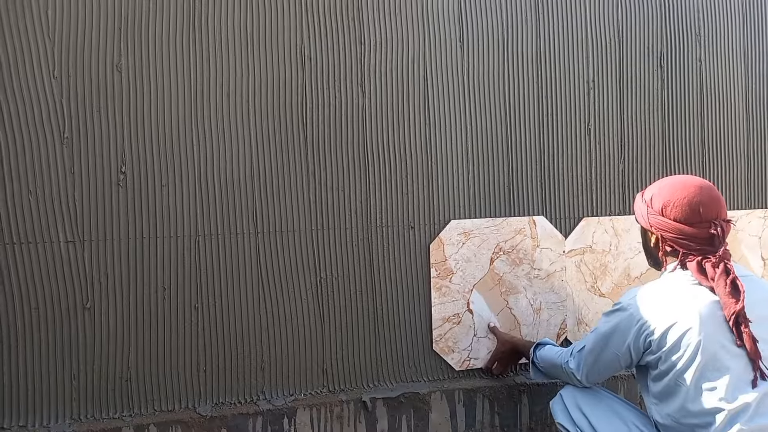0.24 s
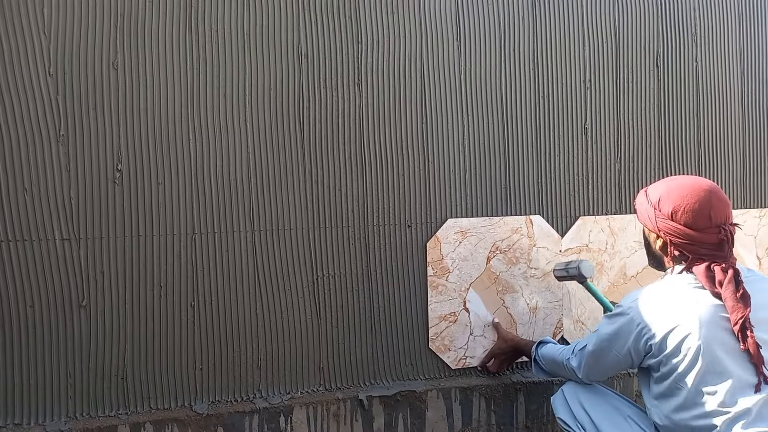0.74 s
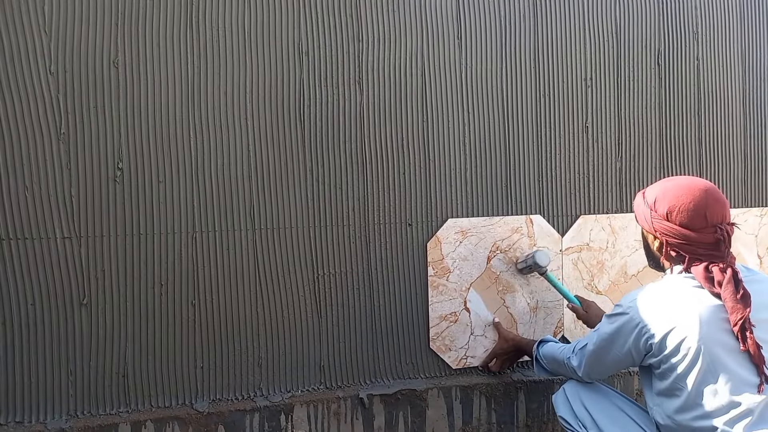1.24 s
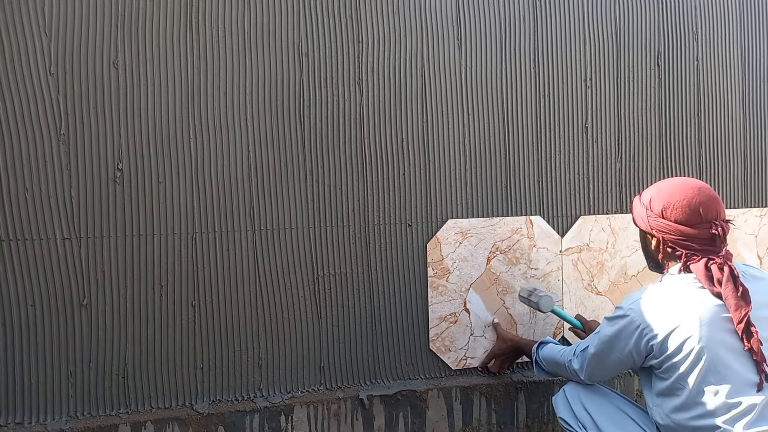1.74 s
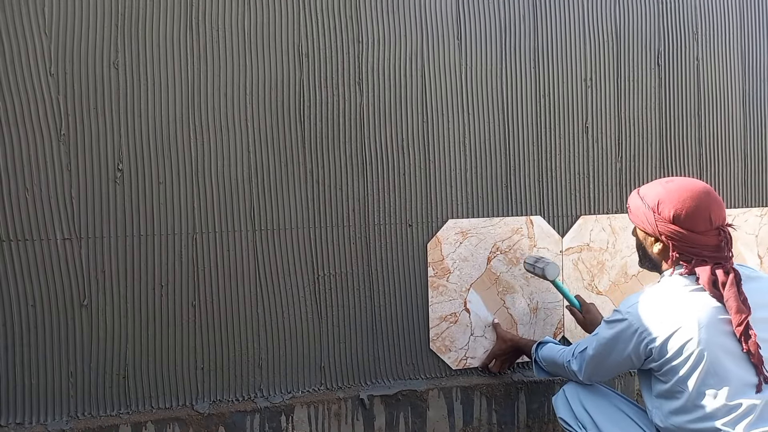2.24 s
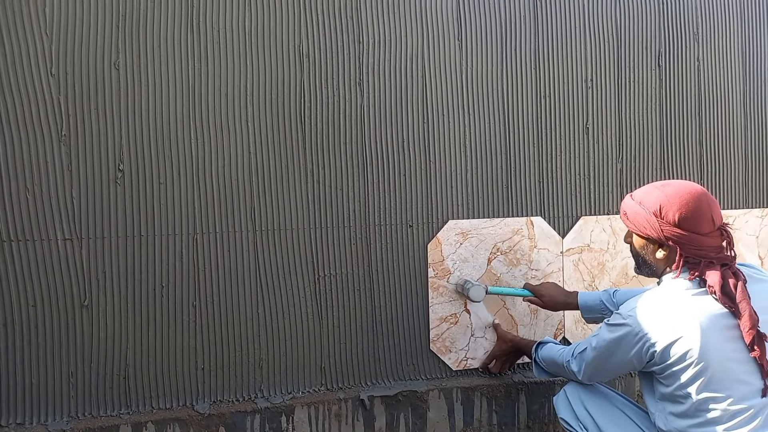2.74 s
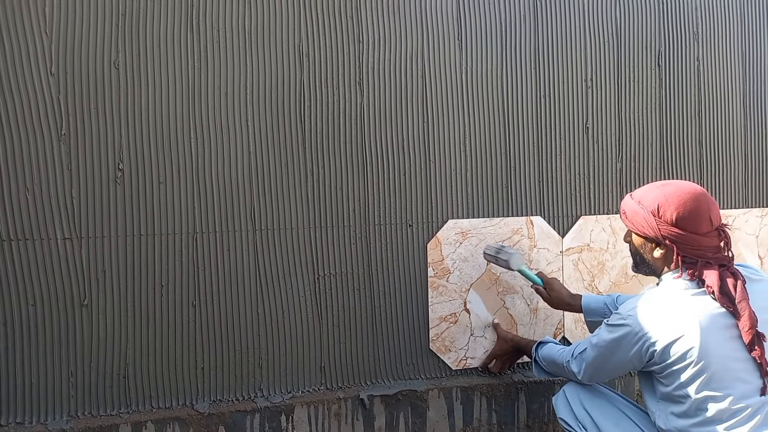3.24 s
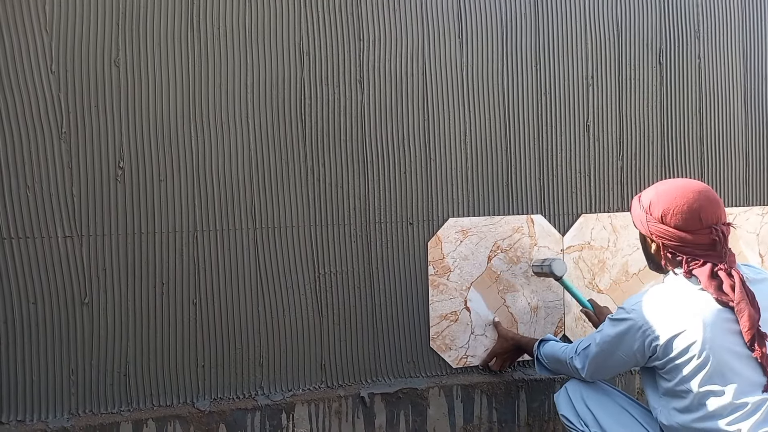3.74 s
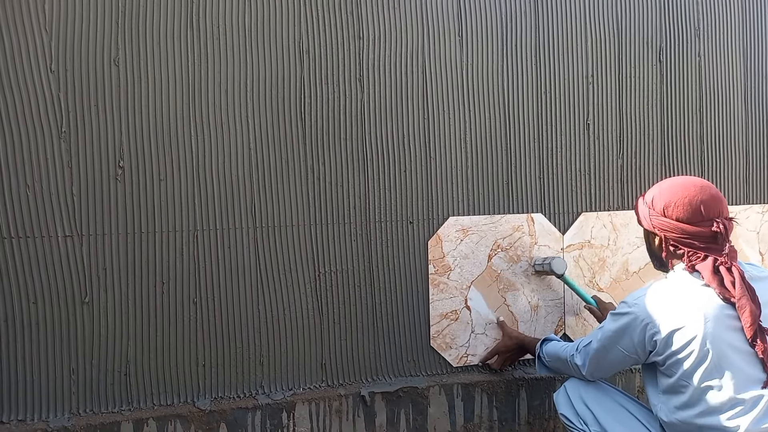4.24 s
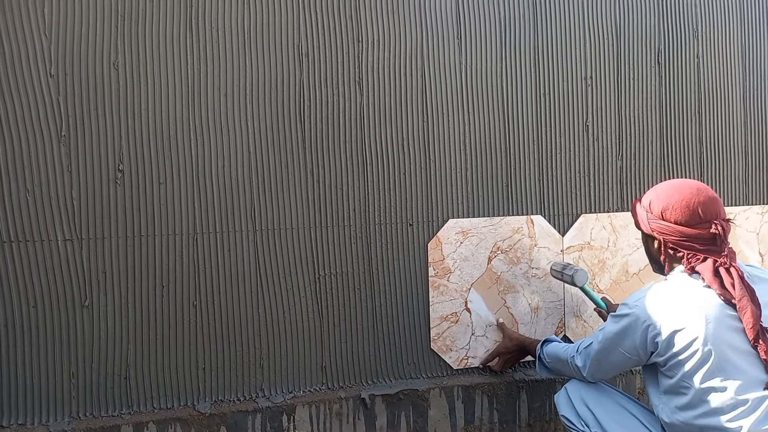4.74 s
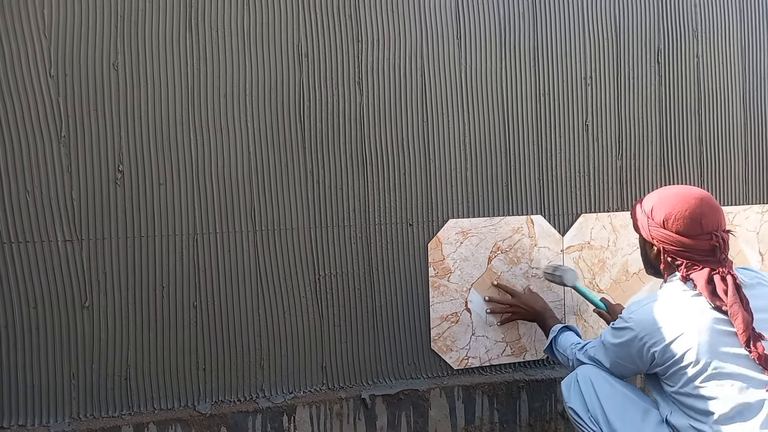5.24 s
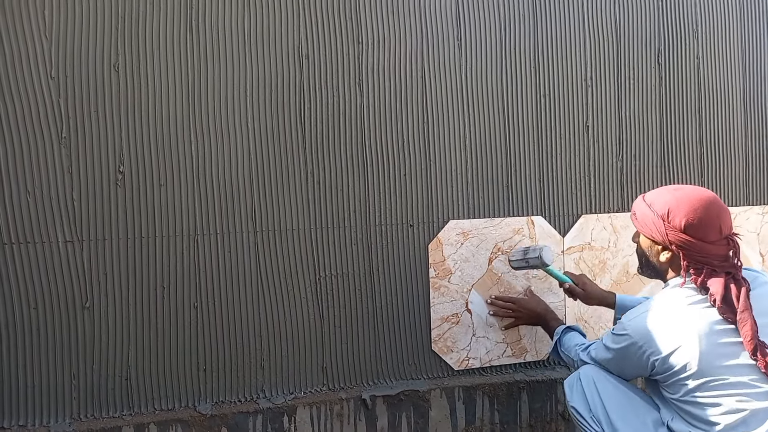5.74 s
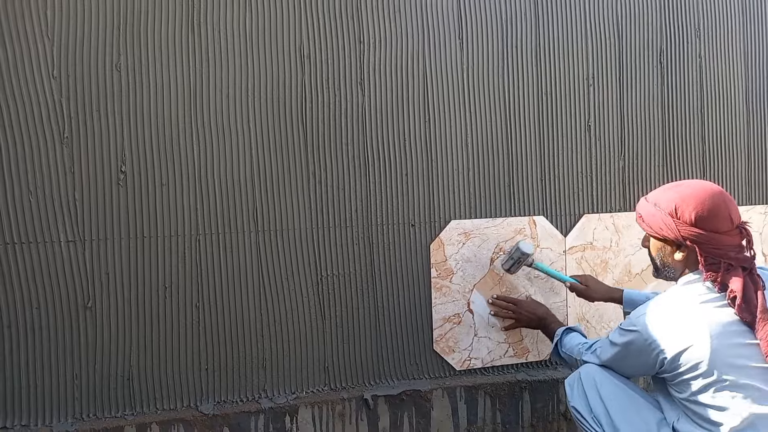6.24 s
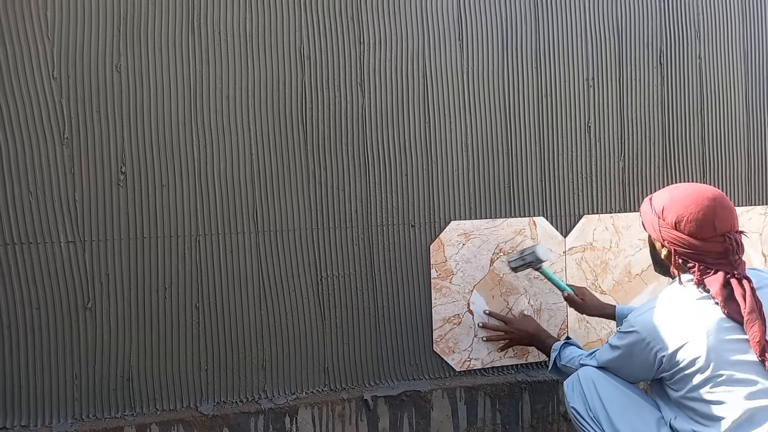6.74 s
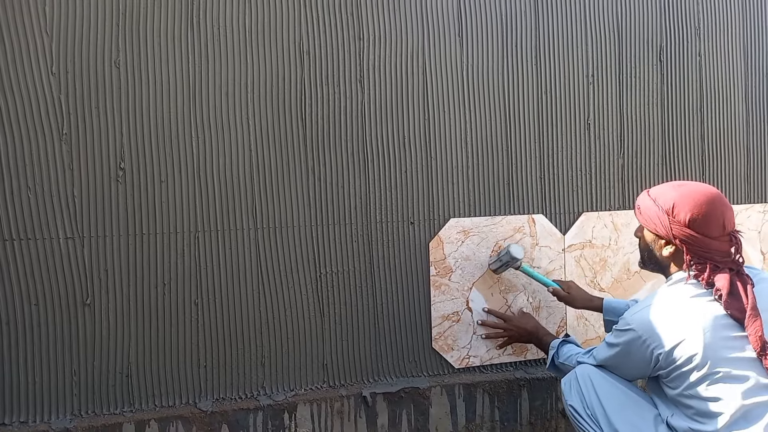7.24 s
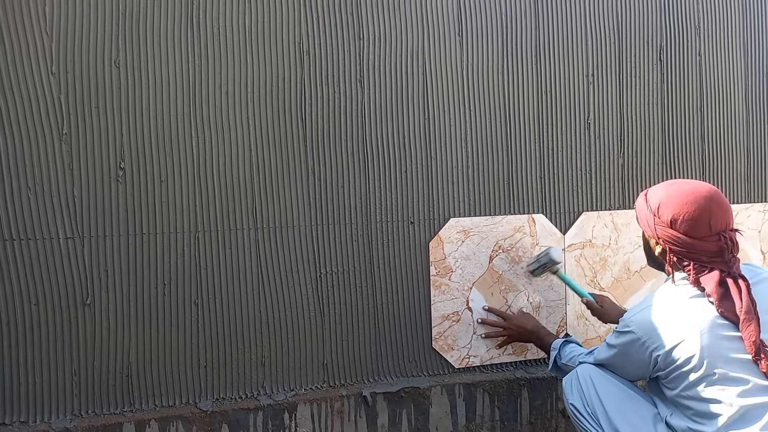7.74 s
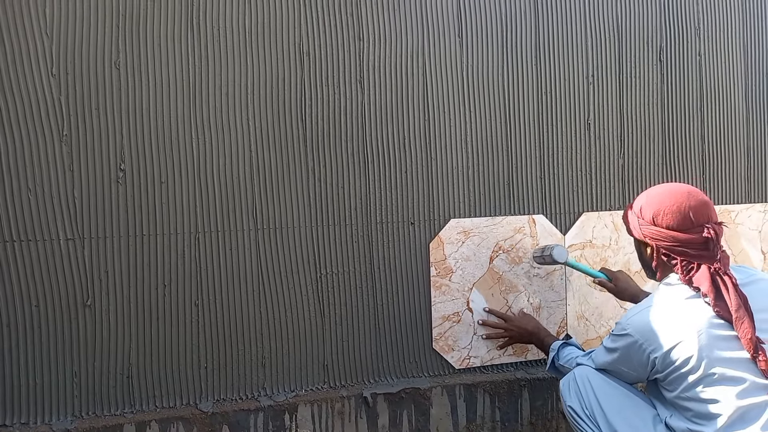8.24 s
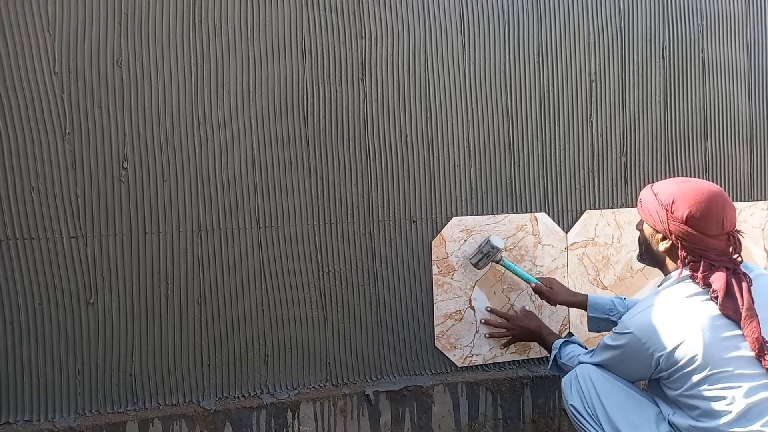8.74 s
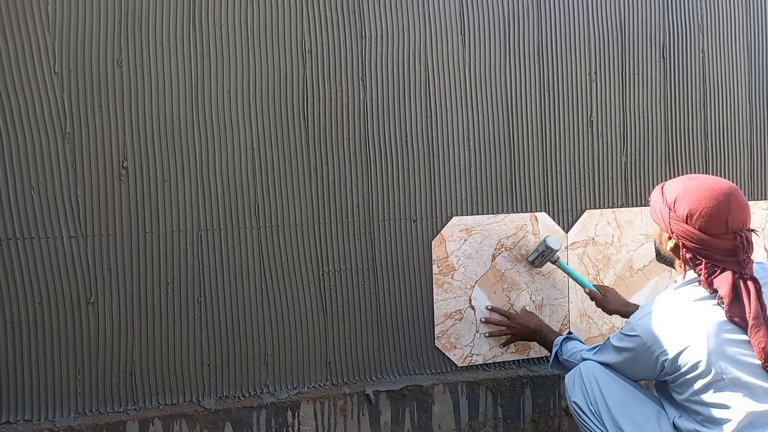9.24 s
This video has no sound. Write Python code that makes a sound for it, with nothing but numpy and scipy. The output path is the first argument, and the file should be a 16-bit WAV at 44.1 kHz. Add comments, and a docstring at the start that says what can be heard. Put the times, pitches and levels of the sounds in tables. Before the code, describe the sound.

A short gritty scrape opens, then a rubber mallet taps a tile on a mortared wall in quick runs of dull, hollow knocks, about seven a second. After about five seconds the taps slow and vary in strength, with more sandy scrapes and stony clicks between. Outdoor building site, quick echo from a facing wall, stereo microphone at moderate distance, hushed pauses.

```python
"""Bedding a tile with a rubber mallet

Quick runs of dull knocks, then slower taps: decaying tile modes plus slap, tick and thud noise, each
after a short swell of noise. A facing wall returns each knock about 36 ms later as a scattered burst.
Gritty strokes, likely a trowel in mortar, reach the right port first: granular noise and a ringing blade.
Bumps, rubs and faint narrow noise bands glide in pitch. Hiss and rumble levels carry the opening
scrape and the knocks' low reverberation."""
import sys
import numpy as np
from scipy import signal
from scipy.fft import rfft, irfft, next_fast_len
from scipy.io import wavfile
from scipy.ndimage import uniform_filter1d

SR = 44100
rng = np.random.default_rng(int(sys.argv[2]) if len(sys.argv) > 2 else 0)


def unload_wav(signal):
    """Save mono or channel-first audio to the path in sys.argv[1] as 16-bit WAV at rate SR, clipped to [-1, 1]."""
    wavfile.write(
        sys.argv[1],
        SR,
        np.round(np.clip(np.atleast_2d(signal).T, -1, 1) * 32767).astype(np.int16),
    )


N = 418068
TIME = np.arange(N) / SR


def undb(db):
    """Decibels to amplitude gain."""
    return 10 ** (np.asarray(db) / 20)


def rms(x):
    """Root mean square, kept above zero."""
    return np.sqrt(np.mean(x ** 2)) + 1e-12


def at(curve, s):
    """Columns of a time curve, interpolated at s."""
    times, *columns = np.transpose(curve)
    return [np.interp(s, times, c) for c in columns]


def colour(x, points):
    """Zero-phase filter through (Hz, dB) points, straight lines over log frequency."""
    hz, db = np.transpose(points)
    size = next_fast_len(x.shape[-1] + 512)
    f_hz = np.maximum(np.arange(size // 2 + 1) * SR / size, 1)
    gain = undb(np.interp(np.log(f_hz), np.log(hz), db))
    return irfft(rfft(x, size) * gain, size)[..., :x.shape[-1]]


def pair(size, likeness):
    """White noise at two microphone ports; likeness is the shared part of its power."""
    shared, *own = rng.standard_normal((3, size))
    likeness = np.clip(likeness, 0, 1)
    return np.sqrt(likeness) * shared + np.sqrt(1 - likeness) * np.array(own)


def shaped(x, points):
    """Coloured sound at rms 1."""
    y = colour(x, points)
    return y / rms(y)


def grains(size, points, likeness, grain_db):
    """Crackle of uneven grains: noise re-scaled at random every 48 samples (1.1 ms), then coloured."""
    level_db = grain_db * np.repeat(rng.standard_normal(size // 48 + 1), 48)[:size]
    return shaped(pair(size, likeness) * undb(level_db), points)


def resonant(size, hz, width_hz):
    """Noise held in one resonance whose centre may glide; rms 1."""
    settle = 4096
    sos = signal.butter(2, min(width_hz / 2, SR / 4), fs=SR, output="sos")
    noise = pair(size + settle, .7) + 1j * pair(size + settle, .7)
    wobble = signal.sosfilt(sos, noise)[:, settle:]
    phase = 2 * np.pi * np.cumsum(hz * np.ones(size)) / SR
    y = np.real(wobble * np.exp(1j * phase))
    return y / rms(y)


def fade(t, t60_s):
    """Exponential decay from time 0, 60 dB per t60."""
    return undb(-60 * np.maximum(t, 0) / t60_s)


def pan(db):
    """Channel gains for a left-minus-right level."""
    return undb(np.array([[db], [-db]]) / 2)


def add(out, s, x):
    """Mix x into out at time s."""
    i = max(int(s * SR), 0)
    out[:, i:i + x.shape[-1]] += x[:, :max(N - i, 0)]


def waver(rate_per_s):
    """Random drift through rate_per_s points a second, spread near 1."""
    return 1.2 * np.interp(TIME * rate_per_s, np.arange(1024), rng.standard_normal(1024))


# hiss and rumble, with the opening scrape and the knocks' low reverberation, relative levels:
# t/s, hiss level/dB, rumble level/dB
HISS_RUMBLE_LEVELS = [(0, -57.5, -52), (.45, -58.5, -53), (.72, -39, -50), (1.1, -54, -43.5),
                      (1.4, -54.5, -45.5), (1.65, -38.5, -31.5), (1.95, -52, -35.5), (3.4, -43.5, -31.5),
                      (4, -52, -38.5), (4.95, -44, -34.5), (5.22, -65, -71.5), (5.5, -50.5, -44),
                      (5.8, -66.5, -60.5), (6.08, -46, -63), (6.35, -62, -73), (7.3, -52, -61),
                      (8.4, -60.5, -59), (9.48, -56, -50)]
# hiss spectrum: f/Hz, level/dB
HISS_SPECTRUM = [(200, -12.5), (900, 0), (1600, 8.5), (2500, 5), (4000, 3.5), (5800, 5.5), (8000, -19),
                 (16000, -8.5)]
# rumble spectrum: f/Hz, level/dB
RUMBLE_SPECTRUM = [(25, -9), (70, 0.5), (135, 9), (190, 1), (320, 9.5), (520, -7), (900, -11.5),
                   (2000, -44)]
HISS_WAVER_DB, HISS_WAVER_PER_S = 2.5, 14
MURMUR_DB, MURMUR_T60_S = -13.5, 0.31  # level relative to blow level + echo curve


def hiss_and_rumble(arrival_s=0.029):
    """Wavering hiss plus rumble; each blow adds decaying low reverberation power to the rumble."""
    hiss_db, rumble_db = at(HISS_RUMBLE_LEVELS, TIME)
    power = undb(rumble_db - 7.0)[None] ** 2
    t = TIME[:SR]
    for s, blow_db, _ in BLOWS:
        echo_db, = at(ECHO_LEVELS, s)
        murmur = undb(blow_db + echo_db + MURMUR_DB) * fade(t, MURMUR_T60_S)
        add(power, s + arrival_s, murmur[None] ** 2)
    hiss_gain = undb(hiss_db + HISS_WAVER_DB * waver(HISS_WAVER_PER_S) - 9)
    hiss = grains(N, HISS_SPECTRUM, 0.1, grain_db=1.5) * hiss_gain
    rumble = shaped(pair(N, 0.2), RUMBLE_SPECTRUM) * np.sqrt(power)
    return (hiss + rumble) * pan(0.92)


# bumps, rubs, and faint narrow noise bands at 2.3-3.3 kHz:
# start t/s, end t/s, first f/Hz, last f/Hz, width/Hz, relative level/dB
GLIDES = [(.103, 0.139, 146, 121, 35, -22), (.083, 0.159, 2430, 2530, 6050, -44),
          (.446, 0.49, 117.6, 97.3, 30, -35.5), (0.514, 0.796, 108.5, 89, 60, -45.5),
          (.79, .835, 1290, 1222, 450, -22.5), (1.48, 1.595, 311, 238.5, 49.7, -20),
          (4.19, 4.473, 1604, 1233, 330, -39.5), (4.634, 4.699, 1308, 1050, 180, -29),
          (4.861, 5.175, 1260, 1135, 176, -49), (5.979, 6.014, 390, 378, 161, -25.5),
          (6.476, 6.539, 416, 416, 60, -23.5), (6.48, 6.521, 694, 693, 100, -21.5),
          (6.525, 6.735, 3050, 3300, 400, -50.5), (7.031, 7.25, 2730, 2440, 350, -55),
          (7.34, 7.489, 2800, 2720, 300, -56), (8.125, 8.207, 2400, 2300, 250, -50),
          (8.668, 8.75, 2630, 2450, 250, -51), (8.282, 8.325, 419, 347, 198, -42.5),
          (8.666, 8.676, 2000, 1920, 900, -19), (9.426, 9.47, 446, 400, 227, -35.5)]


def rubs_and_bands():
    """Noise swells and dies in one resonance per event, gliding in pitch."""
    out, t = np.zeros((2, N)), np.arange(SR // 2) / SR
    for start, end, first_hz, last_hz, width_hz, db in GLIDES:
        progress = np.minimum(t / (end - start), 1)
        hz = first_hz + (last_hz - first_hz) * progress
        sound = resonant(len(t), hz, width_hz) * np.sin(np.pi * progress)
        level = rms(sound[:, progress < 1])
        add(out, start, sound / level * undb(db - 7))
    return out * pan(3.3)


# echo spectrum off the facing wall: f/Hz, level/dB
ECHO_SPECTRUM = [(50, -3), (140, 0.5), (240, 20), (310, 13), (400, 0), (550, 4.5), (900, -8.5),
                 (1400, -3.5), (2200, 4), (6000, 4.5), (16000, -4.5)]


def yard(x, delay_s=0.0355, spread_s=0.0025, early_t60_s=0.12, late_db=-12, late_t60_s=0.25):
    """The facing wall answers in a scattered cluster; a weaker, longer tail wanders round the site."""
    since = np.arange(SR // 2) / SR - delay_s
    onset = np.clip(since / spread_s, 0, 1)
    decay = fade(since, early_t60_s) + undb(late_db) * fade(since, late_t60_s)
    response = colour(pair(len(since), 0.37) * onset * decay, ECHO_SPECTRUM)
    energy_per_port = np.sum(response ** 2) / 2
    return signal.fftconvolve(x, response / np.sqrt(energy_per_port), axes=1)


def blade(x, ripple_db=4.0, count=60):
    """The blade's many modes shift with its angle: each touch gets its own random peaks and dips."""
    hz = np.geomspace(250, 16000, count)
    db = ripple_db * rng.standard_normal(count) - ripple_db ** 2 / 9
    return colour(x, np.c_[hz, db])


def stutter(t, step_s=.007, depth_db=3.0, count=128):
    """The blade catches and slips: a random gain with a new target each step."""
    return undb(depth_db * np.interp(t / step_s, np.arange(count), rng.standard_normal(count)))


def from_right(x, lag_s=.00036):
    """Sound from the right reaches the left port later."""
    return np.array([np.roll(x[0], int(round(lag_s * SR))), x[1]])


# strokes: start t/s, end t/s, relative level/dB, body level re stroke/dB, ring f/Hz
STROKES = [(0.499, 0.89, -48.5, -8.5, 1550), (0.525, 0.549, -33, -0.5, 1913),
           (0.572, 0.586, -37, -3.5, 1910), (.879, 0.914, -48.5, 6, 1330), (1.493, 1.55, -46, 11.5, 1940),
           (1.536, 1.583, -38, 13, 2046), (1.604, 1.636, -47.5, 17, 2290), (2.038, 2.05, -42.5, 5.5, 2170),
           (2.781, 2.802, -43, 17.5, 1570), (2.89, 2.903, -42, 6, 2240), (3.219, 3.288, -29.5, -6.5, 3160),
           (3.504, 3.59, -37.5, -2.5, 1685), (3.564, 3.62, -30, -5.5, 1980),
           (3.894, 3.965, -36.5, 4.5, 1610), (4.192, 4.231, -42.5, 4.5, 1590),
           (4.444, 4.51, -32, -6.5, 2520), (4.814, 4.84, -28.5, 1.5, 1994), (5.109, 5.153, -34, -5, 3266),
           (5.615, 5.671, -28.5, -5, 2557), (5.871, 5.893, -37, -21, 1936), (5.907, 5.994, -29.5, -4, 3100),
           (6.024, 6.059, -29, -14.5, 2265), (6.184, 6.237, -29, -1, 3230), (6.412, 6.437, -51, -24, 1440),
           (6.459, 6.518, -25.5, -15.5, 1560), (6.695, 6.716, -31.5, -24.5, 1460),
           (6.728, 6.816, -25.5, -13, 1327), (6.824, 6.852, -28, 1.5, 3000), (6.862, 6.895, -37, -24, 4180),
           (6.998, 7.033, -27, -29, 3700), (7.248, 7.277, -32, -3, 2120), (7.293, 7.32, -30, -6.5, 5870),
           (7.47, 7.486, -46, 1.5, 6120), (7.515, 7.531, -38, 5.5, 2110), (7.65, 7.682, -36.5, 6, 1260),
           (7.702, 7.733, -23, -26, 4100), (7.96, 7.972, -41.5, -7, 2155), (7.996, 8.001, -43.5, 5.5, 5750),
           (8.051, 8.063, -43.5, -15, 1600), (8.107, 8.119, -40.5, 14, 2120),
           (8.231, 8.25, -29, -22.5, 2085), (8.472, 8.506, -40, -11.5, 1530), (8.575, 8.588, -40, 13, 1960),
           (8.634, 8.674, -40, -5, 1940), (8.747, 8.788, -28.5, -17.5, 2500),
           (8.954, 8.968, -51.5, 9, 1400), (9.029, 9.104, -34, -8, 3190), (9.247, 9.254, -40.5, -13, 1604),
           (9.355, 9.376, -30.5, -5, 3150)]
# stones catching under the blade: t/s, relative level/dB
STONES = [(.545, -13.5), (0.6358, -21), (.836, -17.5), (1.5427, -10), (2.8948, -12.5), (3.5763, -13),
          (3.9297, -7), (4.4848, -2), (5.665, -6.5), (5.906, -4), (5.954, -6), (6.484, -6), (6.7057, -6.5),
          (7.295, -3), (7.4854, -11.5), (7.5266, -6), (7.9707, -12), (8.058, -13), (8.666, -7),
          (8.751, -2.5), (9.2555, -16.5)]
# bright sand spectrum: f/Hz, level/dB
GRIT_SPECTRUM = [(900, -36.5), (2000, 3), (3000, 0), (4500, -3), (6000, -3.5), (16000, -4)]
# rasp spectrum: f/Hz, level/dB
RASP_SPECTRUM = [(300, -27), (750, -1.5), (1100, 2), (1600, 4), (2100, -6), (3200, -25)]
# hollow body spectrum: f/Hz, level/dB
BODY_SPECTRUM = [(30, -29), (100, -5.5), (220, -9), (350, 3), (550, 5), (800, 0), (1500, -31)]
# lighter strokes are duller: more rasp for each dB below a firm one
FIRM_STROKE_DB, RASP_DB, RASP_PER_DB = -30, -2.35, 0.4
# a short touch lets the blade ring, a long drag damps it
RING_DB, RING_STROKE_S, RING_DB_PER_DOUBLING = -3.5, 0.033, 3
STONE_RASP_DB = -6  # re grit part of the click


def trowel(bite_s=0.0048, release_t60_s=0.061, arch_db=3.0):
    """Sand dragged under a blade: grit, rasp, hollow body and one ringing mode; stones click."""
    out, t = np.zeros((2, N)), np.arange(SR * 2 // 3) / SR
    lead_s = .04
    for start, end, db, body_db, ring_hz in STROKES:
        length_s = max(end - start, .003)
        since = t - lead_s
        rasp_db = RASP_DB + RASP_PER_DB * (FIRM_STROKE_DB - db)
        ring_db = RING_DB - RING_DB_PER_DOUBLING * np.log2(length_s / RING_STROKE_S)
        contact = np.exp(np.minimum(since, 0) / bite_s) * fade(since - length_s, release_t60_s)
        # the hand bears down hardest in mid-stroke
        arch = np.sin(np.pi * np.clip(since / length_s, 0, 1)) - 0.59
        pressure = contact * undb(arch_db * arch) * stutter(t)
        grit = grains(len(t), GRIT_SPECTRUM, 0.13, grain_db=2.0) * undb(6.5)
        rasp = grains(len(t), RASP_SPECTRUM, 0.21, grain_db=1.5) * undb(rasp_db)
        body = grains(len(t), BODY_SPECTRUM, 1.0, grain_db=3.5) * undb(body_db + 3.0)
        ring = resonant(len(t), ring_hz, 290) * undb(ring_db)
        stroke = blade(grit + rasp + body) + ring
        add(out, start - lead_s, stroke * pressure * undb(db))
    t = t[:SR // 16]
    for s, db in STONES:
        grit = shaped(pair(len(t), 0.52), GRIT_SPECTRUM)
        rasp = shaped(pair(len(t), 0.89), RASP_SPECTRUM) * undb(STONE_RASP_DB)
        add(out, s, blade(grit + rasp) * fade(t, 0.033) * undb(db - 8.5))
    # mostly the low body returns from the wall
    wall = [(150, -15), (450, -22), (900, -38.5), (3000, -36.5), (8000, -29.0)]
    echo = colour(yard(out)[:, :N], wall)
    return (from_right(out) + echo) * pan(1.5)


# tile bending modes damped by mortar: f/Hz, level/dB, t60/s, swing direction (sign)
TILE_MODES = [(139.7, -19.5, 0.13, 1), (215, -37, 0.2, 1), (344, -1, 0.016, 1), (409.8, -2.5, 0.043, -1),
              (535, -6, 0.025, -1), (663, -22.5, 0.044, -1), (1334, -30, 0.054, 1)]


def tile_ring(t, pitch):
    """Decaying tile modes; each spot detunes and weighs them a little, each port weighs them too."""
    hz, db, t60_s, swing = np.array(TILE_MODES).T[:, :, None]
    chance = rng.standard_normal((4, len(TILE_MODES), 1))
    mode_hz = hz * pitch * (1 + 0.018 * chance[0])
    modes = np.sign(swing) * fade(t, t60_s) * np.sin(2 * np.pi * mode_hz * t)
    mode_db = db + 1.2 * chance[1] + 1.8 * chance[2:]
    ring = np.sum(undb(mode_db) * modes, axis=1)
    return ring / rms(ring[:, t < .012])


# mallet blows, flatter landings slap more: t/s, level/dB, relative slap level/dB
BLOWS = [(0.8998, -20.5, -4.5), (1.0535, -17.5, -9.5), (1.197, -17, -8), (1.3074, -15.5, -7.5),
         (1.4397, -15.5, -8), (1.7042, -18.5, -6), (1.8292, -17, -7.5), (1.9582, -15.5, -8),
         (2.1082, -15.5, -7.5), (2.2358, -15, -8), (2.3607, -14.5, -7), (2.5372, -16, -7.5),
         (2.6757, -17, -13), (2.841, -20.5, -25), (2.9359, -16.5, -7.5), (3.0676, -16.5, -8),
         (3.201, -15, -8), (3.3349, -13.5, -9.5), (3.4645, -15, -7.5), (3.6313, -14, -7),
         (3.772, -16.5, -9.5), (3.9, -21, -10), (4.0611, -15.3, -9.5), (4.1913, -14.5, -13.5),
         (4.4513, -17, -9), (4.591, -17.5, -9.5), (4.7126, -16.5, -7), (4.8243, -18.5, -8),
         (5.32, -18, -9.5), (5.47, -14.5, -16.5), (5.5845, -16.5, -9), (5.932, -22, -16),
         (6.086, -15.5, -8.5), (6.205, -22, -13), (6.5808, -16.5, -7), (6.838, -26.5, -10),
         (7.0379, -19.5, -20), (7.264, -19.5, -14), (7.4298, -17.5, -13.5), (7.663, -28, -7),
         (7.8137, -14, -7), (8.1071, -23, -9.5), (8.576, -25, -23), (8.75, -16.5, -12.5),
         (8.8659, -17, -12.5), (8.984, -25.5, -24), (9.178, -26, -13), (9.3171, -25.5, -5)]
# tick and halo levels over time, relative to blow: t/s, tick level/dB, halo level/dB
TICK_HALO_LEVELS = [(1, -27.5, -13), (1.4, -20.5, -24), (2.3, -15.5, -23), (3.25, -9.5, -29.5),
                    (3.7, -15.5, -20), (4.6, -12, -23), (5.5, -14.5, -19.5), (6.55, -16.5, -19.5),
                    (7.05, -16.5, -12.5), (7.8, -15.5, -26), (9.3, -19, -26)]
# echo relative to its blow: t/s, relative level/dB
ECHO_LEVELS = [(.9, -13), (1.8, -8), (2.3, -13), (3.1, -9), (3.6, -12.5), (4.8, -8.5), (6.3, -17.5),
               (7.5, -8.5), (7.85, -26), (8.6, -13.5), (9, -37)]
# rubber slap spectrum: f/Hz, level/dB
SLAP_SPECTRUM = [(300, -41.5), (700, 7), (1300, 4.5), (1800, -2), (2600, -19.5), (6000, -47)]
# tick spectrum: f/Hz, level/dB
TICK_SPECTRUM = [(900, -10.5), (2200, 5.5), (4000, 2), (6000, 0), (16000, -12.5)]
# wall thud spectrum: f/Hz, level/dB
THUD_SPECTRUM = [(25, -26), (70, -6), (135, 14), (200, -8.5), (400, -55.5)]
# spectrum of the halo, a short swell of noise before each knock: f/Hz, level/dB
HALO_SPECTRUM = [(60, -8.5), (350, 3), (700, 1.5), (1000, -7.5), (1300, 3), (1700, -10.5), (2300, -12),
                 (6000, -20.5), (16000, -38)]
# softer blows ring higher; each spot is tuned a little differently
FIRM_BLOW_DB, SOFT_RISE_PER_DB, SPOT_SCATTER = -16.5, .0075, .014


def mallet(halo_rise_s=0.0068):
    """The tile rings, the wall thuds, the rubber slaps and ticks; a noise halo swells before each knock."""
    out, t = np.zeros((2, N)), np.arange(SR // 4) / SR
    lead = t[:SR // 28]
    for s, db, slap_db in BLOWS:
        tick_db, halo_db = at(TICK_HALO_LEVELS, s)
        echo_db, = at(ECHO_LEVELS, s)
        softness_db = FIRM_BLOW_DB - db
        pitch = 1 + SOFT_RISE_PER_DB * softness_db + SPOT_SCATTER * rng.standard_normal()
        slap = shaped(pair(len(t), 0.51), SLAP_SPECTRUM) * fade(t, 0.018) * undb(slap_db + 7.0)
        tick = shaped(pair(len(t), 0.21), TICK_SPECTRUM) * fade(t, 0.024) * undb(tick_db + 4.5)
        thud_shape = fade(t, 0.28) * np.minimum(t / 0.0022, 1)
        thud = shaped(pair(len(t), 0.9), THUD_SPECTRUM) * thud_shape * undb(-21.5)
        blow = tile_ring(t, pitch) + slap + tick + thud
        echo = yard(blow)
        echo /= rms(echo[:, int(.038 * SR):int(.07 * SR)])
        # the halo ends as the knock starts
        swell = 1 / (1 + np.exp((.022 - lead) / (halo_rise_s / 2)))
        halo = shaped(pair(len(lead), 0.84), HALO_SPECTRUM) * swell
        add(out, s - lead[-1], halo * undb(db + halo_db + 3) * pan(7.8))
        add(out, s, blow * undb(db) * pan(2.4))
        add(out, s, echo * undb(db + echo_db + 1.5) * pan(1.6))
    return out


def scene():
    """Hiss and rumble, rubs and narrow bands, trowel and mallet together."""
    return hiss_and_rumble() + rubs_and_bands() + trowel() + mallet()


# noise suppressor bands: centre f/Hz, threshold level/dB
SUPPRESSOR_BANDS = [(300, -59), (1300, -62.5), (4500, -70), (11000, -78.5)]


def suppress(x, window_s=.025, depth_db=-14):
    """Noise suppressor: each band sinks smoothly toward depth_db as its power falls past threshold."""
    hz, threshold_db = np.transpose(SUPPRESSOR_BANDS)
    log_f = np.log1p(np.arange(N // 2 + 1) * SR / N)
    floor = undb(depth_db)
    out = 0
    for own, db in zip(np.eye(len(hz)), threshold_db):
        share = np.interp(log_f, np.log(hz), own)
        band = irfft(rfft(x) * share, N)
        power = uniform_filter1d(np.mean(band ** 2, axis=0), int(window_s * SR))
        openness = power / (power + undb(db) ** 2)
        out = out + band * (floor + (1 - floor) * openness)
    return out


# overall response, thin bass, broad drop above 7 kHz, partial return near 15 kHz: f/Hz, level/dB
OVERALL_RESPONSE = [(20, -15), (40, -8.5), (80, -3.5), (130, -2), (6200, 0.5), (6700, -7.5), (7200, -22.5),
                    (8000, -27), (10000, -18), (14000, -20), (14800, -8.5), (15700, -9), (16200, -40)]
TOP_HZ = 16300


def record(dry):
    """Peaks round off, the overall response colours (left duller), pauses are hushed, the top is cut."""
    rounded = np.tanh(dry * .6) / .6
    left, right = colour(rounded, OVERALL_RESPONSE)
    left = colour(left, [(7000, 2), (9000, -5), (15000, -3)])
    hushed = suppress(np.array([left, right]))
    top_cut = signal.ellip(8, .2, 70, TOP_HZ, fs=SR, output="sos")
    return signal.sosfilt(top_cut, hushed)


dry = scene()
out = record(dry)
unload_wav(out)
```